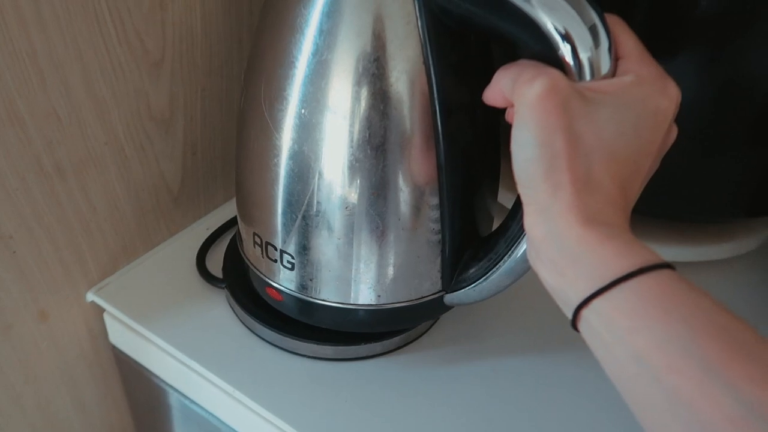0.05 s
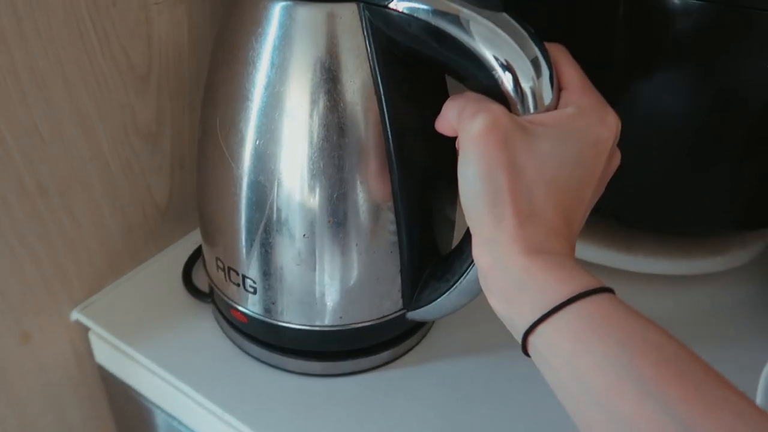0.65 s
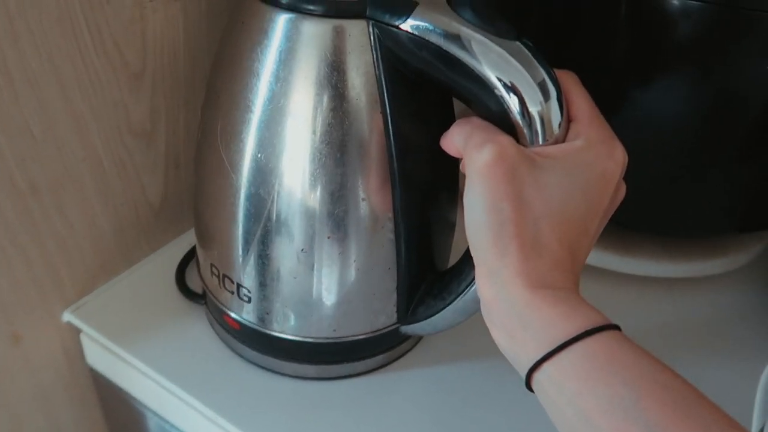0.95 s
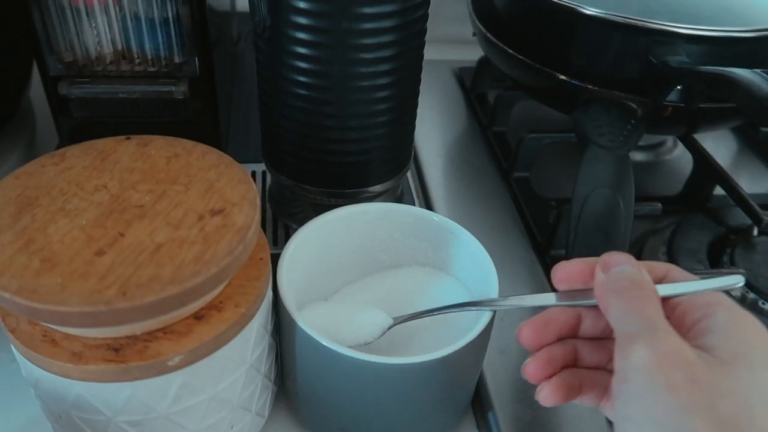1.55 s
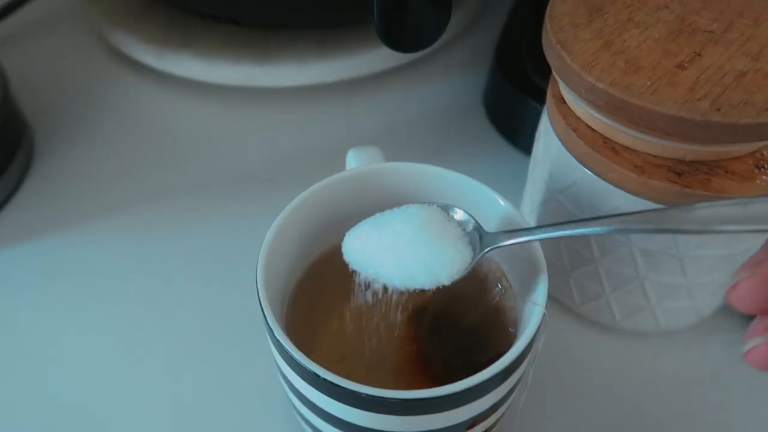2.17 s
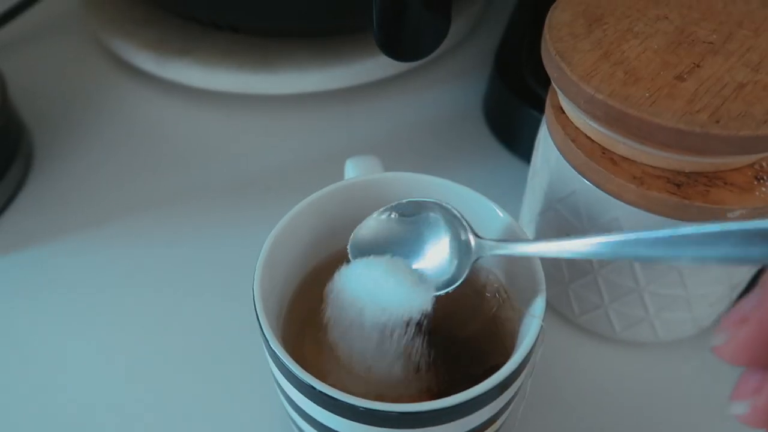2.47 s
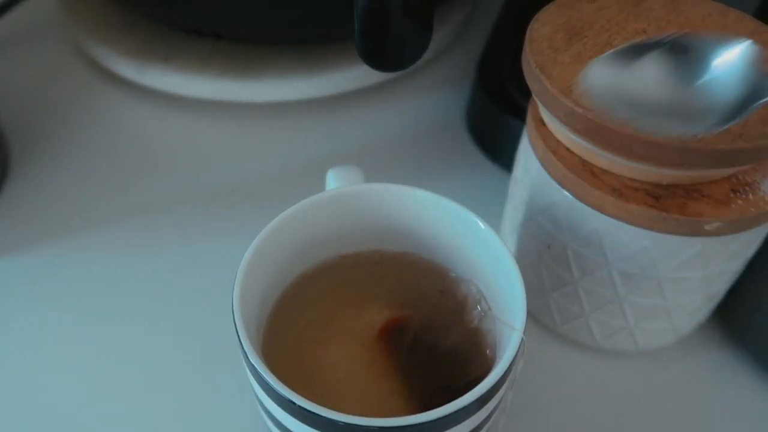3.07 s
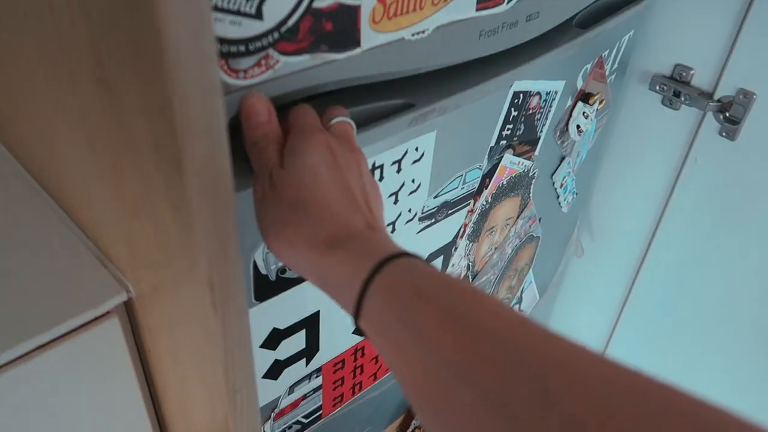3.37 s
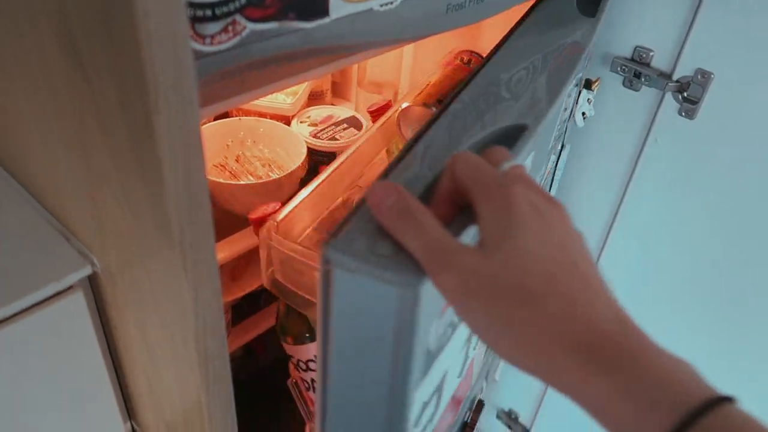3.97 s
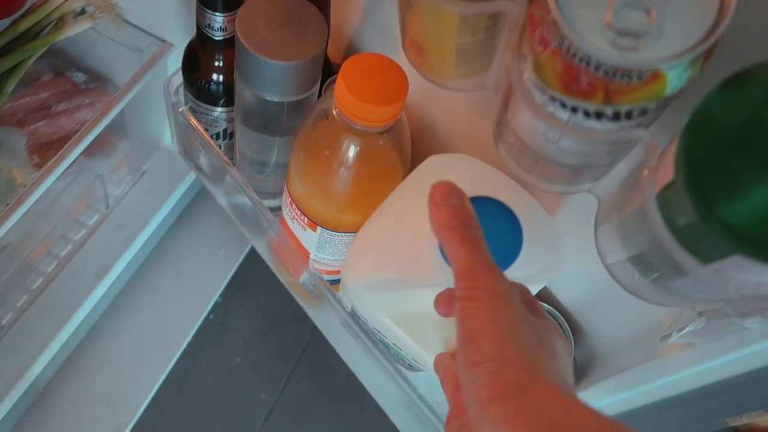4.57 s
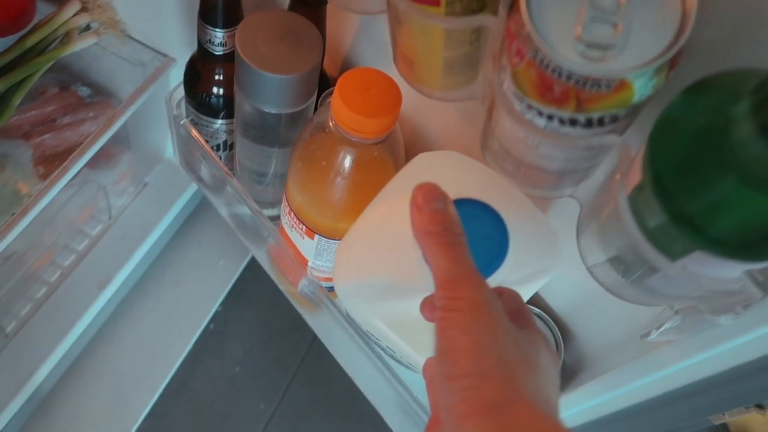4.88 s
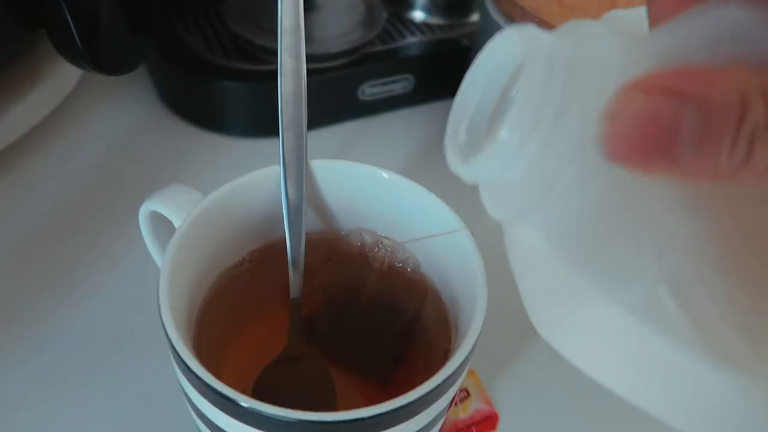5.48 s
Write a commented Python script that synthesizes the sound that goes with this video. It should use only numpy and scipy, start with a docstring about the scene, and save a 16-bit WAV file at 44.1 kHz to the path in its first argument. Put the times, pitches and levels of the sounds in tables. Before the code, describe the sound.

A steel kettle taps its plastic base and drops into place with a dry clack. A spoon ticks softly in a jar, crunches into sugar and taps a mug, and the sugar trickles faintly. Then a fridge door peels off its rubber seal and thumps open, and a plastic milk bottle grates along the shelf. The sounds are close and in stereo, in a small kitchen with low room noise.

```python
"""Making tea in a small kitchen

A steel kettle clacks onto its plastic base, a spoon ticks in a sugar jar and on a mug, and sugar trickles.
A fridge door peels off its rubber seal and pops open; a plastic milk bottle grates along the door shelf.
Hits ring each object's modes; scrapes are showers of tiny slips. Underneath sit low room noise, a drone,
a thin whine and the fridge's hum. The handling is heard in close stereo with a short room tail."""
import sys
import numpy as np
from scipy import signal
from scipy.fft import rfft, irfft, next_fast_len
from scipy.io import wavfile
from scipy.ndimage import uniform_filter1d, map_coordinates

SR = 44100
rng = np.random.default_rng(int(sys.argv[2]) if len(sys.argv) > 2 else 0)


def inscribe(sig):
    """Save sig as 16-bit PCM at rate SR to the path in sys.argv[1].

    A 1-D sig is mono; a 2-D sig holds one channel per row.
    Samples are clipped to [-1, 1] before scaling.
    """
    pcm = np.round(np.clip(np.atleast_2d(sig).T, -1, 1) * 32767)
    wavfile.write(sys.argv[1], SR, pcm.astype(np.int16))


N = 252693
TIME = np.arange(N) / SR

# Hits on each object: (time [s], level over 20 ms [dB], low cut [Hz], high cut [Hz])
BASE_HITS = [(.055, -23.5, 200, 2200), (.1187, -25.5, 200, 2000), (.1625, -33.5, 220, 1200)]  # the kettle's foot on its plastic base
KETTLE_HITS = [(.605, -35, 220, 600), (.643, -31.5, 220, 700), (.654, -24, 200, 700),
               (.6735, -12.5, 110, 4200), (.679, -26, 55, 170), (.6745, -35, 2800, 9000),
               (.7275, -14, 140, 310), (.7295, -31.5, 850, 1300), (.848, -34, 260, 1000),
               (.989, -41, 500, 4500), (1.003, -28, 175, 1400), (1.074, -52, 1000, 2500)]
SOCKET_HITS = [(.6735, -18.2, 400, 4000), (1.002, -43.5, 600, 1700)]  # the socket snaps on, then seats itself
JAR_HITS = [(1.5615, -41.5, 330, 1300), (1.8395, -49, 900, 1500)]  # the spoon pushes against the jar, then clips its rim
MUG_HITS = [(2.153, -39, 800, 14000), (2.176, -45.5, 1200, 11000)]
DOOR_HITS = [(3.2803, -36.5, 110, 7000), (3.3115, -25.3, 600, 1800), (3.329, -28, 140, 6050),
             (3.346, -39.5, 11100, 14000), (3.3995, -13.5, 90, 5000), (3.4005, -34, 3200, 7500),
             (3.41, -22, 650, 1200), (3.469, -30, 90, 2000), (3.6092, -13, 150, 6500), (3.62, -24, 70, 200),
             (3.634, -26.5, 260, 1800), (3.693, -36, 300, 900)]
BOTTLE_HITS = [(4.7405, -28.5, 130, 1200), (4.7455, -32, 160, 3500), (4.83, -39, 600, 1800),
               (4.8495, -27.5, 950, 8000), (5.236, -31.5, 250, 750), (5.378, -34, 120, 350)]
# Spoon hits, ringing higher once out of the sugar:
# (time [s], level over 20 ms [dB], low cut [Hz], high cut [Hz], pitch [ratio])
SPOON_HITS = [(1.288, -43, 1200, 7500, 1), (1.374, -59, 3000, 5000, 1), (1.547, -55, 1800, 6000, 1),
              (1.676, -54.5, 1300, 1300, 1), (1.839, -41, 2200, 12000, 1.045)]

# Ringing modes of each object: (frequency [Hz], level [dB], t60 [s])
BASE_MODES = [(231, -5, 0.12), (376, 2.5, 0.047), (504, -21, 0.071), (681, -11, 0.13), (768, -11, 0.054),
              (1255, -22, 0.1), (1880, -20.5, .04)]
KETTLE_MODES = [(116, -6, .2), (184, 3, 0.2), (227, 6.5, 0.19), (300, 2, 0.1), (360, -2, 0.08),
                (567, -8.5, .19), (694, -14, 0.16), (790, -5.5, 0.09), (1100, -12, .12), (1330, -11, 0.1),
                (1550, -15, .07), (1800, -14, 0.1), (2035, -13, 0.06), (2893, -20, 0.06)]
SOCKET_MODES = [(1330, -5, .025), (1520, -7, .025), (1860, 1, .022), (2050, 0, .02), (2893, -5, .02),
                (3300, -6, .013)]
SPOON_MODES = [(1960, 4, 0.06), (2860, -3, 0.03), (3720, 2, 0.025), (4900, 5, 0.035), (5000, -7, 0.12),
               (5220, 0, .04), (8050, -5, 0.035), (9100, -7, 0.05), (9850, -9, .04)]
JAR_MODES = [(470, 0, .07), (620, -8, .05), (950, -7, .07), (1260, -11, .05)]
MUG_MODES = [(1043, 1, 0.066), (1520, -1, .04), (3430, 1, 0.032), (3700, -1, .03), (4700, -6, 0.035),
             (5870, -1, 0.038), (7200, -7, .025), (9050, -7, 0.05), (10050, -10, .03), (12701, -12, .03)]
DOOR_MODES = [(149, 5.5, 0.125), (240, -4, 0.07), (361, -1, 0.09), (395, 0, 0.1), (465, -3.5, 0.075),
              (575, -1.5, .1), (690, -7, 0.07), (950, -7, 0.045), (1130, -7, .055), (1400, -8, 0.045),
              (2100, -12, 0.055), (2350, -17, 0.05), (3520, -19, 0.045), (3880, -20, .035),
              (4090, -17.5, 0.04)]
BOTTLE_MODES = [(215, -2, .06), (525, -1.5, 0.063), (820, 0, .05), (1003, -10, 0.1), (1400, 2, 0.03),
                (2300, 1, 0.035), (2490, 3.5, 0.035), (2950, -7, .05), (3500, -4, 0.045),
                (4650, -9.5, 0.05), (5300, -5, .035), (7200, -13, .03)]

# Tone colour of each source's noise, contact crack and dense modes: (frequency [Hz], level [dB])
ROOM_EQ = [(15, -25), (25, -7.5), (96, -8), (178, -11.5), (233, -22), (267, -14), (410, -24), (445, -16.5),
           (510, -28), (900, -35), (4260, -45.5), (13200, -59), (15500, -73)]
BASE_EQ = [(120, -7), (400, 2), (800, -11), (1200, -22), (3200, -30.5), (4500, -37), (12000, -48)]
KETTLE_EQ = [(40, -7), (70, 10), (130, -2), (230, 7), (400, 3.5), (700, -3), (1000, -8.5), (2000, -14),
             (2500, -20), (3400, -23), (3800, -30), (6000, -32), (11000, -45), (15000, -55)]
SPOON_EQ = [(400, 15.5), (1000, 12), (2000, 0.5), (5300, 2), (6500, -9), (8700, -3.5), (10500, -8),
            (14000, -17), (16000, -48)]
SCOOP_EQ = [(200, 0), (450, 8), (800, -9), (1200, -6), (2000, -7), (3000, -18), (5000, -14), (7000, -26),
            (14000, -30)]
POUR_EQ = [(800, 7), (1700, 7), (3500, -17), (8000, -17), (14000, -27)]
DOOR_EQ = [(41, -43), (75, -3), (150, 0), (600, -14), (1160, -23), (1900, -29), (3990, -34), (4880, -41),
           (11500, -39), (15000, -49)]
SEAL_EQ = [(53, -32), (145, 2.5), (227, -3), (407, 0), (828, -15), (1000, -6.5), (1300, -13.5),
           (2710, -19.5), (4260, -28), (12500, -44), (15500, -60)]
CRACKLE_EQ = [(300, -20), (1200, -2), (2200, 0), (3800, -4), (5500, -13), (12500, -15), (15500, -29)]
SWING_EQ = [(120, -3.5), (250, 6), (520, 1.5), (700, -17), (1050, -19), (1350, -17), (1750, -25),
            (2250, -20), (3000, -34), (9000, -48)]
HINGE_EQ = [(900, -25), (1800, -10), (2250, 0), (2900, -20), (4200, -15), (6000, -35)]
BOTTLE_EQ = [(120, 12), (800, -5), (2500, -6), (4200, -13), (5500, -13), (6500, -20), (8000, -17),
             (15000, -30)]
SLIDE_EQ = [(120, 2.5), (250, 2.5), (520, -3), (750, -9), (1100, -6.5), (1800, -13.5), (2500, -15),
            (3600, -20), (5300, -21), (7000, -28), (11000, -33.5), (14000, -49)]
GRIT_EQ = [(900, -15), (2500, 0), (3500, -3), (5300, -8), (12000, -24)]  # the bottle's ribs catching on the shelf
JUDDER_EQ = [(110, -13), (170, 2.5), (340, 2.5), (480, -9), (700, -13.5), (870, 0.5), (1050, -16),
             (1500, -18), (3000, -32.5), (8000, -79)]

# Envelopes of swells and rubs: (start [s], hold [s], level [dB], attack [s], release [s])
DRONE_SWELL = (1.35, 1.9, -46.5, 9, 4)
KETTLE_SCRAPES = [(.665, .04, -36, .25, .16), (.94, .035, -39, .15, .16)]
SUGAR_SCOOP = (1.549, .018, -43.5, .08, .17)
SUGAR_POUR = (2.52, .1, -58, .6, .5)
SEAL_PEEL = (3.316, .07, -25.2, .03, .48)
SEAL_CRACKLE = (3.334, .044, -37, .04, .14)  # sticky rubber snapping loose bit by bit
DOOR_RUBS = [(3.64, .02, -32, .05, .4), (3.88, .7, -47.5, .2, .2)]  # breaking free, then swinging
HINGE_RUBS = [(3.85, .08, -62, .3, .15), (4.13, .04, -61, .15, .2)]
BOTTLE_PULL = (4.755, .635, -41.5, 1.1, .55)  # drives slide, grit and walls, each with its own trim
BOTTLE_JUDDER = (5.09, .3, -39, .4, .42)  # against the shelf's rim

# Fader moves of the motor whine and the compressor hum: (time [s], level [dB])
WHINE_FADER = [(1.2, -68), (1.6, -53), (1.85, -59), (2.35, -64), (2.55, -52), (3.25, -52), (3.9, -56),
               (5, -70)]
HUM_FADER = [(3.8, -40), (3.96, -47), (4.762, -30), (5.072, -36), (5.472, -30), (5.575, -45), (5.618, -39),
             (5.7, -55)]

# Stereo width of the handling and of the room noise: (frequency [Hz], side gain [dB])
HANDLING_WIDTH = [(60, -29), (150, -23), (380, -19.5), (700, -26), (1300, -21), (2400, -14.5), (4400, -7),
                  (8000, 1), (15000, 4.5)]
ROOM_WIDTH = [(60, -38), (110, -34), (200, -16), (380, -9.5), (700, -1.5), (1500, -0.5), (15000, 1.5)]


def undb(db):
    """Decibels to gain."""
    return np.exp(np.asarray(db) * (np.log(10) / 20))


def unit(x):
    """Scale to rms 1."""
    return x / np.sqrt(np.mean(x ** 2))


def fader(points):
    """Gain through (time [s], level [dB]) points, silent outside them."""
    times, db = np.transpose(points)
    return undb(np.interp(TIME, times, db, left=-200, right=-200))


def stroke(start_s, hold_s, db, attack_s, release_s, push_db=0):
    """Envelope: a 60 dB attack up to the start, a hold that gains push_db, a 60 dB release."""
    t = TIME - start_s
    fade = np.maximum(-t, 0) / attack_s + np.maximum(t - hold_s, 0) / release_s
    return undb(db + push_db * np.clip(t / hold_s, 0, 1) - 60 * np.minimum(fade, 10))


def drift(rate_hz):
    """Smooth random modulation with rms 1."""
    step = int(SR / rate_hz)
    held = np.repeat(rng.standard_normal(N // step + 2), step)
    return unit(uniform_filter1d(uniform_filter1d(held, step), step)[:N])


def eq_gains(points, size):
    """Gain per FFT bin through (frequency [Hz], level [dB]) points."""
    hz, db = np.transpose(points)
    bin_hz = np.maximum(np.arange(size // 2 + 1) * SR / size, 1)
    return undb(np.interp(np.log(bin_hz), np.log(hz), db))


def colour(x, eq):
    """Minimum-phase EQ, built by folding the cepstrum: nothing rings ahead of a hit."""
    size = 8192
    cepstrum = irfft(np.log(eq_gains(eq, size)))
    cepstrum[1:size // 2] *= 2
    cepstrum[size // 2 + 1:] = 0
    response = irfft(np.exp(rfft(cepstrum)))[:size // 2]
    return signal.oaconvolve(x, response)[:len(x)]


def band(x, low_hz, high_hz):
    """Low cut and high cut, 12 dB per octave each."""
    for hz, kind in ((low_hz, "high"), (high_hz, "low")):
        x = signal.sosfilt(signal.butter(2, hz, kind, fs=SR, output="sos"), x)
    return x


def through(x, response):
    """Pass a sound through a response of unit energy."""
    return signal.fftconvolve(x, response / np.linalg.norm(response))[:N]


def widen(mid, side, width):
    """Left and right from mid and an equalised side."""
    size = next_fast_len(N + SR // 10, real=True)
    side = irfft(rfft(side, size) * eq_gains(width, size), size)[:N]
    return np.array([mid + side, mid - side])


def ringing(modes, t):
    """Decaying sines of a struck object, slightly detuned on every hit."""
    detune = 1 + .002 * rng.standard_normal(len(modes))
    return sum((-1) ** k * np.sin(2 * np.pi * hz * detune[k] * t) * undb(db - 60 * t / t60)
               for k, (hz, db, t60) in enumerate(modes))


def wash(t, t60, damping):
    """Countless overlapping modes: octaves of noise, t60 at 1 kHz, the higher ones dying sooner."""
    spectrum = rfft(rng.standard_normal(len(t)))
    bin_hz = np.arange(len(spectrum)) * SR / len(t)
    octave = np.log2(np.clip(bin_hz, 125, 16000) / 1000)
    out = 0
    for k in range(-3, 5):
        noise = irfft(spectrum * np.maximum(1 - abs(octave - k), 0), len(t))
        decay_s = t60 * 2 ** (-damping * k)
        out = out + noise * undb(-60 * t / decay_s) / np.sqrt(decay_s)
    return unit(out)


def knocks(hits, modes, eq, crack_db, wash_db, wash_t60, damping):
    """Each hit layers the object's ring, a contact crack and a wash of dense modes."""
    t = TIME[:SR // 5]
    out = np.zeros(N + len(t))
    crack = undb(crack_db) * unit(colour(1. * (t == 0), eq))
    for time_s, db, low_hz, high_hz in hits:
        dense = undb(wash_db) * unit(colour(wash(t, wash_t60, damping), eq))
        hit = band(unit(ringing(modes, t)) + crack + dense, low_hz, high_hz)
        start = int(time_s * SR)
        out[start:start + len(t)] += hit * undb(db) / np.std(hit[:SR // 50])
    return out[:N]


def friction(envelope, eq, slips_per_s, scatter_db, flutter_db):
    """Many tiny slips of uneven size sound through a body."""
    chance, size = rng.random(N), rng.exponential(size=N)
    at = np.flatnonzero(chance < slips_per_s / SR)
    slips = np.zeros(N)
    slips[at] = (-1.) ** at * undb(scatter_db * np.minimum(size[at], 4))
    return unit(colour(slips, eq)) * undb(flutter_db * drift(45)) * envelope


def snaps(envelope, eq, snaps_per_s, cycles, scatter_db):
    """Separate tiny snaps, each ringing for a few cycles at its own pitch."""
    low_hz, high_hz = 1100, 14000
    when, pitch, size = rng.random((int(snaps_per_s * N / SR), 3)).T
    hz = low_hz * (high_hz / low_hz) ** pitch
    gain = hz * undb(scatter_db * np.minimum(-np.log(1 - size), 3))
    offsets = np.arange(SR // 100)
    turns = np.outer(hz, offsets / SR)
    rings = gain[:, None] * np.sin(2 * np.pi * turns) * np.exp(-turns / cycles)
    at = (when * N).astype(int)[:, None] + offsets
    shower = np.bincount(at.ravel(), rings.ravel(), N)[:N]
    return unit(colour(shower, eq)) * envelope


def wavering_tone(hz, spread_hz, rate_hz, flutter_db):
    """A sine that wanders in level and pitch."""
    flutter = undb(flutter_db * drift(9))
    phase = 2 * np.pi * np.cumsum(hz + spread_hz * drift(rate_hz)) / SR
    return flutter * unit(np.sin(phase))


def room_noise():
    """The kitchen's low, steady rush."""
    rush = band(colour(rng.standard_normal(N), ROOM_EQ), low_hz=42, high_hz=15900)
    return undb(-43) * unit(rush)


def drone():
    """A low, wavering drone swells and fades."""
    return stroke(*DRONE_SWELL) * wavering_tone(hz=93, spread_hz=4, rate_hz=14, flutter_db=2.5)


def kettle():
    """The kettle taps its plastic base, scrapes over it and drops into place with a dry clack."""
    taps = knocks(BASE_HITS, BASE_MODES, BASE_EQ, crack_db=-1.5, wash_db=.5, wash_t60=.05, damping=.25)
    body = knocks(KETTLE_HITS, KETTLE_MODES, KETTLE_EQ,
                  crack_db=-4, wash_db=2.5, wash_t60=.075, damping=.14)
    clack = knocks(SOCKET_HITS, SOCKET_MODES, KETTLE_EQ,
                   crack_db=-10, wash_db=-5, wash_t60=.02, damping=.1)
    scraping = sum(stroke(*row) for row in KETTLE_SCRAPES)
    scrape = friction(scraping, KETTLE_EQ, slips_per_s=3200, scatter_db=1.5, flutter_db=2)
    return taps + body + clack + scrape


def motor_whine():
    """A motor's thin, unsteady whine."""
    return fader(WHINE_FADER) * wavering_tone(hz=452, spread_hz=3, rate_hz=20, flutter_db=1.8)


def spoon():
    """The spoon rings as it ticks in the jar, knocks the jar's wall and taps the mug."""
    ticks = 0
    for *hit, pitch in SPOON_HITS:
        modes = [(hz * pitch, db, t60) for hz, db, t60 in SPOON_MODES]
        ticks += knocks([hit], modes, SPOON_EQ, crack_db=-6, wash_db=2.5, wash_t60=.075, damping=.1)
    jar = knocks(JAR_HITS, JAR_MODES, SCOOP_EQ, crack_db=-8, wash_db=-4, wash_t60=.06, damping=.15)
    mug = knocks(MUG_HITS, MUG_MODES, SPOON_EQ, crack_db=-3, wash_db=3, wash_t60=.06, damping=.1)
    return ticks + jar + mug


def sugar():
    """Grains crunch as the spoon digs in, then trickle into the tea."""
    scoop = friction(stroke(*SUGAR_SCOOP), SCOOP_EQ, slips_per_s=1500, scatter_db=4, flutter_db=1.5)
    pour = friction(stroke(*SUGAR_POUR), POUR_EQ, slips_per_s=5100, scatter_db=7.5, flutter_db=1.5)
    return scoop + pour


def fridge_door():
    """The rubber seal peels and crackles; the door thumps free, rattles and swings on a dry hinge."""
    thumps = knocks(DOOR_HITS, DOOR_MODES, DOOR_EQ, crack_db=-7, wash_db=1, wash_t60=.1, damping=.12)
    peel = friction(stroke(*SEAL_PEEL), SEAL_EQ, slips_per_s=2000, scatter_db=2, flutter_db=1.2)
    crackle = snaps(stroke(*SEAL_CRACKLE), CRACKLE_EQ, snaps_per_s=1300, cycles=2.5, scatter_db=4.5)
    swinging = sum(stroke(*row) for row in DOOR_RUBS)
    swing = friction(swinging, SWING_EQ, slips_per_s=6000, scatter_db=2, flutter_db=.6)
    rubbing = sum(stroke(*row) for row in HINGE_RUBS)
    hinge = friction(rubbing, HINGE_EQ, slips_per_s=1200, scatter_db=2.5, flutter_db=1.5)
    return thumps + peel + crackle + swing + hinge


def compressor_hum():
    """The fridge's compressor hums at twice the mains frequency."""
    return fader(HUM_FADER) * unit(np.sin(2 * np.pi * 100 * TIME))


def tick(time_s=4.48):
    """One thin, dry tick with no ring."""
    impulse = signal.unit_impulse(N, int(time_s * SR))
    return undb(-20) * band(impulse, low_hz=200, high_hz=10000)


def milk_bottle():
    """Plastic grates along the shelf, rings its flexing walls, knocks its neighbours and judders free."""
    bumps = knocks(BOTTLE_HITS, BOTTLE_MODES, BOTTLE_EQ,
                   crack_db=-7, wash_db=1, wash_t60=.06, damping=.18)
    # As the bottle lifts, the hiss eases and the judder builds.
    pull = stroke(*BOTTLE_PULL, push_db=-3.5)
    lift = stroke(*BOTTLE_JUDDER, push_db=7)
    slide = friction(pull, SLIDE_EQ, slips_per_s=3000, scatter_db=2, flutter_db=1.3)
    grit = snaps(pull * undb(2 * drift(25)), GRIT_EQ, snaps_per_s=2200, cycles=7, scatter_db=2.5)
    rub = rng.standard_normal(N) * undb(3 * drift(60))
    wall_ring = unit(through(rub, ringing(BOTTLE_MODES, TIME[:SR // 5])))
    wall_pitch = 1 + .025 * drift(10)  # the walls detune as the grip shifts
    walls = map_coordinates(wall_ring, [np.cumsum(wall_pitch)], mode="mirror") * pull
    judder = friction(lift, JUDDER_EQ, slips_per_s=900, scatter_db=1, flutter_db=.6)
    return bumps + undb(2.7) * slide + undb(-16) * grit + undb(-9.7) * walls + judder


def room_tail(send, t60, damping):
    """The kitchen's reverb blooms just after the direct sound."""
    t = TIME[:SR]
    bloom = 1 - np.exp(-(t / .012) ** 2)
    return through(send, wash(t, t60, damping) * bloom)


def close_stereo(direct, tail_mid, tail_side):
    """A close pair agrees in the bass; a small lag, near reflections and the room spread the treble."""
    t = TIME[:SR // 10]
    reflections = through(direct, rng.standard_normal(len(t)) * np.exp(-t / .008))
    # A lag between the pair shows as side signal a quarter cycle from the mid.
    lagged = np.imag(signal.hilbert(direct, next_fast_len(N)))[:N]
    side = .6 * lagged + .75 * reflections + 1.6 * tail_side
    return widen(direct + tail_mid, side, HANDLING_WIDTH)


def scene():
    """The foley, each prop with its own reverb send, over a bed of tones and room noise."""
    pot, sweetening, door, bottle = kettle(), spoon() + sugar(), fridge_door(), milk_bottle()
    send = undb(-15) * pot + undb(-22.5) * sweetening + undb(-13) * door + undb(-27.5) * bottle
    tails = [room_tail(send, t60=.5, damping=.12) for _ in range(2)]
    foley = close_stereo(pot + sweetening + door + bottle + tick(), *tails)
    tones = drone() + motor_whine() + compressor_hum()
    return foley + tones + widen(room_noise(), room_noise(), ROOM_WIDTH)


def record(dry):
    """A steep high cut takes the very top off the mix."""
    cutoff_hz = 15800
    return signal.sosfilt(signal.ellip(8, .2, 70, cutoff_hz, fs=SR, output="sos"), dry)


dry = scene()
out = record(dry)
inscribe(out)
```